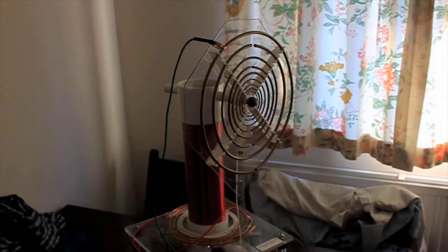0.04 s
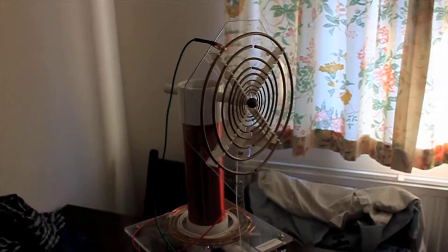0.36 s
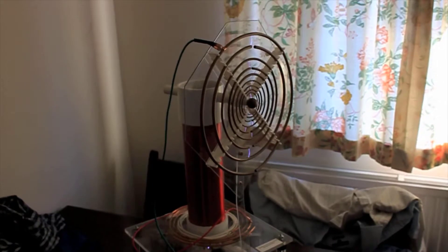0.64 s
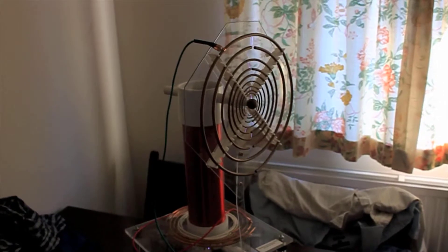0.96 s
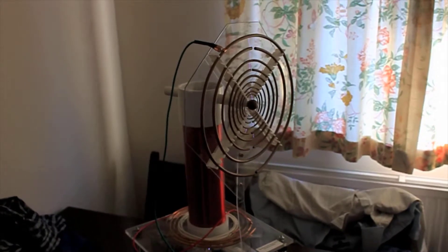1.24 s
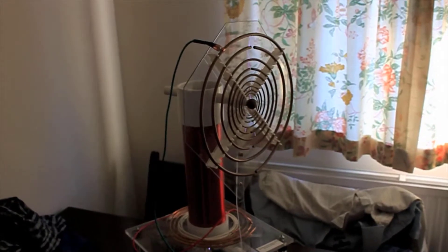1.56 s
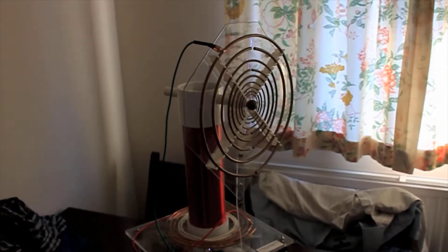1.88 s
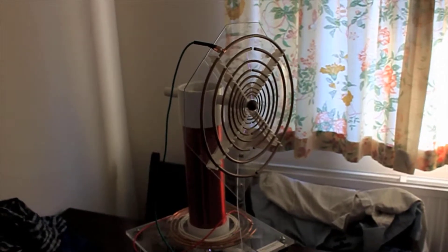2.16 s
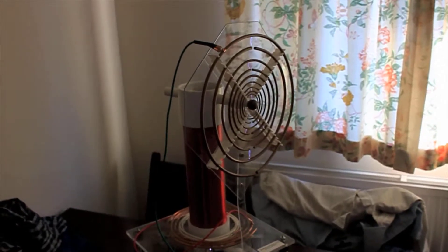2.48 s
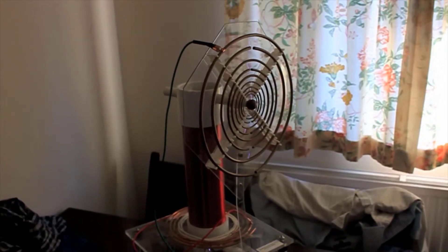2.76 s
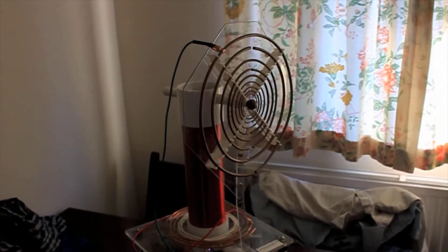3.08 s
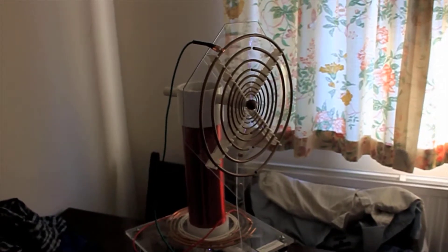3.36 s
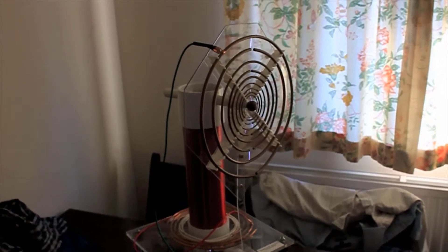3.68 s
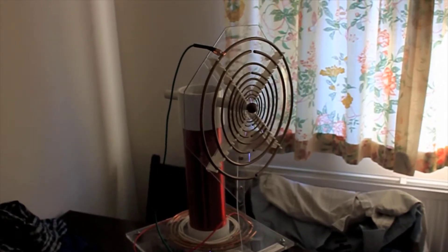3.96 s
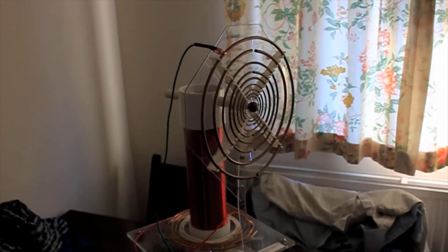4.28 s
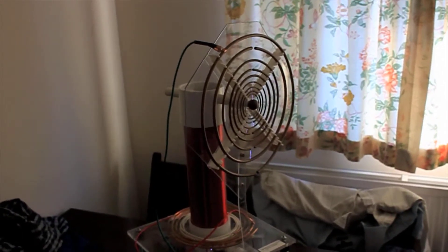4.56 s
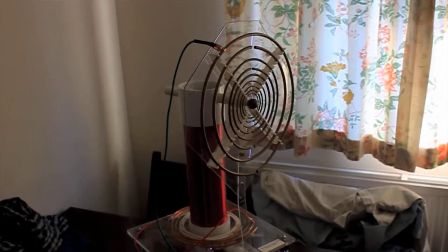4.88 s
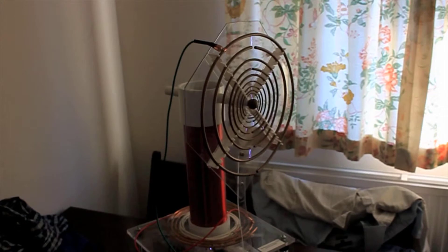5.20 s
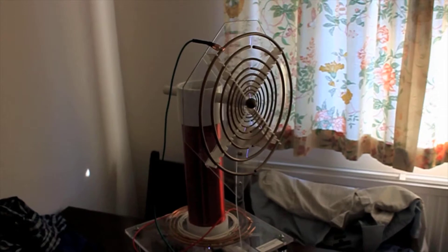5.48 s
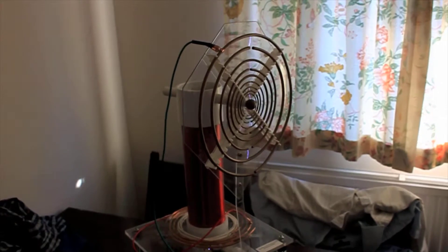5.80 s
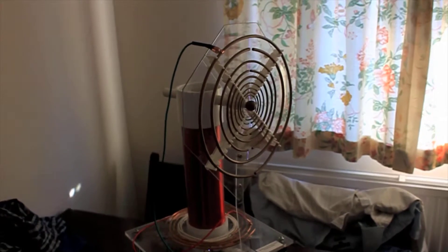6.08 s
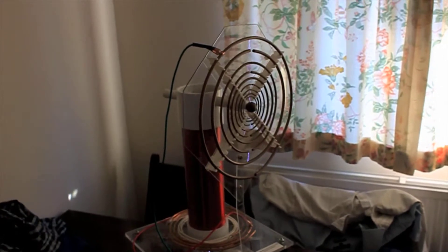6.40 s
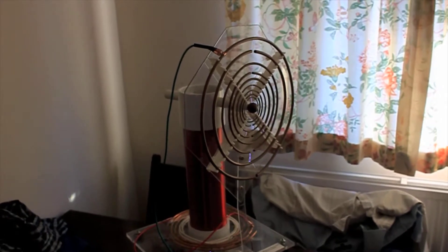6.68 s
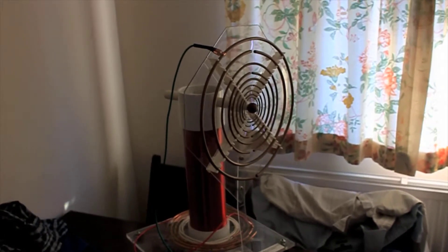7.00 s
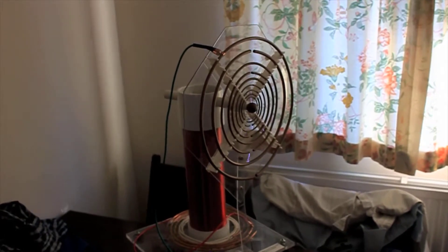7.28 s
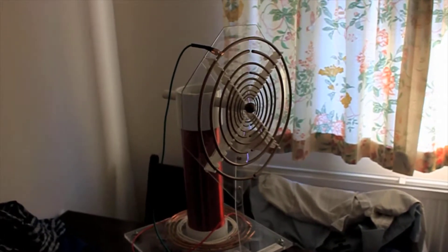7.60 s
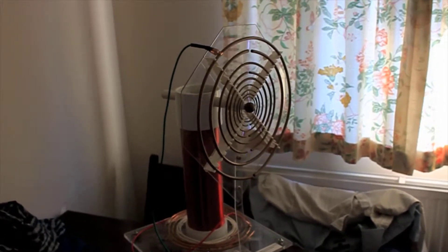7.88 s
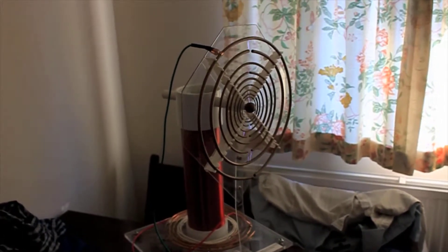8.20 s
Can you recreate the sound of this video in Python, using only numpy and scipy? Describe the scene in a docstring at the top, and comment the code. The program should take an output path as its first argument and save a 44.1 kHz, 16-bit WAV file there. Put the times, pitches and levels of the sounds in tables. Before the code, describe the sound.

Loud, steady, high electrical hiss and buzz from a sparking coil indoors, with flickering crackle and a faint hum beneath.

```python
"""Spark-gap coil in a small room

The gap fires nonstop, many times per mains half cycle: a loud, bright, buzzing hiss.
Streamers crackle from the top of the coil, flaring and stalling; their pushes of hot air
add up to a faint hum, and the longest ones pop. One microphone feeds both channels."""
import sys
import numpy as np
from scipy import signal
from scipy.fft import rfft, irfft, next_fast_len
from scipy.io import wavfile
from scipy.ndimage import uniform_filter1d

SR = 44100
rng = np.random.default_rng(int(sys.argv[2]) if len(sys.argv) > 2 else 0)


def to_wav(sig):
    """Store sig (one row per channel, or 1-D mono) as 16-bit WAV at the path in sys.argv[1].

    Samples outside -1..1 are clipped; the rate is SR.
    """
    pcm = np.clip(np.atleast_2d(sig), -1, 1) * 32767
    pcm = np.round(pcm).astype(np.int16)
    wavfile.write(sys.argv[1], SR, pcm.T)  # frames by channels


N = 363825
TIME_S = np.arange(N) / SR
MAINS_HZ = 50.022

# Spectrum of one gap firing. Each row: frequency in Hz, relative level in dB.
GAP_SPECTRUM = [(300, -41), (2000, -24), (4000, -13), (6300, -9), (7300, -5.5), (9500, -5), (10500, -3.5),
                (11800, -1.6), (13000, 0.5), (13700, -1.5), (14800, -1.5), (15600, -6)]
# Spectrum of one streamer. Each row: frequency in Hz, relative level in dB.
STREAMER_SPECTRUM = [(20, -28), (35, -15), (55, -15), (90, -6.5), (150, -2), (220, -3.5), (300, -3.5),
                     (700, -2), (1100, -0.5), (1700, 1.5), (2200, 1), (2700, -2), (4000, -3), (6000, -11.5),
                     (12000, -25.5)]
# Resonances of apparatus and room. Each row: frequency in Hz, width in Hz, lift in dB.
RESONANCES = [(1100, 40, 3.1), (1395, 40, 2.4), (1630, 110, 3.6), (3198, 220, 3.0), (4307, 50, 3.1),
              (4560, 200, 2.8), (4910, 50, 3.1), (5340, 50, 3.9), (5663, 90, 3.2), (5932, 90, 5.2),
              (6718, 50, 3.6), (6891, 50, 3.0), (7354, 120, 2.7), (8133, 40, 3.2), (8368, 40, 2.6),
              (8701, 50, 4.3), (9317, 45, 1.6), (9950, 50, 3.3), (10635, 60, 3.1), (11070, 70, 6.5),
              (11361, 55, 3.1), (11609, 80, 5.5), (11938, 70, 5.5), (12193, 70, 5.8), (12542, 60, 2.9),
              (12980, 70, 3.3), (13225, 60, 2.8), (14617, 60, 1.9), (14795, 90, 3.0), (15000, 90, 4.1)]
# Room decay. Each row: frequency in Hz, T60 in seconds.
ROOM_T60 = [(150, 0.17), (1500, 0.35), (6000, 0.22), (15000, 0.11)]
# Slow drift of streamer reach. Each row: time in seconds, level in dB.
REACH_DRIFT = [(0, -31), (.6, -34), (.8, -33.5), (1.05, -31), (1.5, -31), (2.3, -32.5), (2.6, -34.5),
               (2.98, -35), (3.27, -30), (3.45, -34), (4.05, -33), (4.45, -35), (4.8, -32.5), (5.2, -33),
               (6.05, -35), (6.42, -33), (7.4, -34.5), (8.25, -33.5)]
# Streamers flare. Each row: centre in seconds, length in seconds, lift in dB.
REACH_FLARES = [(.855, 0.046, 2.5), (1.52, 0.05, 2), (2.28, 0.068, 2.5), (2.81, 0.043, 4.5), (4.11, .06, 4),
                (4.68, 0.084, 2), (5.85, .04, 5), (7.07, .08, 2.5)]
# Streamers stall. Each row: centre in seconds, length in seconds, drop in dB.
REACH_STALLS = [(.61, .06, 1), (.75, .07, 2.5), (.91, 0.079, 3), (1.386, 0.042, 3), (2.21, 0.092, 2.5),
                (2.675, .07, 2), (2.91, .08, -1), (3.93, 0.045, 4), (4.24, 0.087, 2), (4.5, .1, 2),
                (5.25, 0.064, 4), (5.62, .1, 3), (5.98, 0.081, 2), (6.67, 0.074, 3), (7.29, 0.15, 2)]
# Hiss near 12 kHz, mean removed in use. Each row: time in seconds, lift in dB.
SIZZLE_LIFT = [(0, 5), (.3, 3.5), (.6, 5.5), (1.6, 5), (2.35, 3), (3.6, 4), (4.45, 3), (4.75, 4),
               (5.2, 2.7), (6.3, 4.5), (6.95, 1.5), (7.15, 5.5), (7.9, 2.5), (8.25, 3)]
# Hiss above 13.5 kHz, mean removed in use. Each row: time in seconds, lift in dB.
AIR_LIFT = [(0, 1.2), (.7, 2.3), (1.55, -1), (3.3, -1), (3.55, 3.5), (3.9, -.9), (5.5, 1.5), (6.05, -1),
            (6.9, 1.5), (7.25, -1.2), (8.25, 1)]
# Pops of the longest streamers. Each row: start in seconds, peak in dB.
STREAMER_POPS = [(.448, -25), (.861, -26), (1.071, -23), (1.667, -20), (2.530, -25), (2.969, -28),
                 (6.385, -26)]


def gain(db):
    """dB to amplitude."""
    return 10 ** (np.asarray(db) / 20)


def unit_rms(x):
    """Scale to rms 1."""
    return x / np.sqrt(np.mean(x ** 2) + 1e-20)


def at_hz(table, hz):
    """Interpolate on a log-frequency axis."""
    row_hz, values = np.transpose(table)
    return np.interp(np.log(hz + 1), np.log(row_hz + 1), values)


def curve(table):
    """Interpolate in time, per sample."""
    return np.interp(TIME_S, *np.transpose(table))


def wander(corner_hz):
    """Low-passed noise, rms 1."""
    hz = np.fft.rfftfreq(N, 1 / SR)
    phases = np.exp(2j * np.pi * rng.random(len(hz)))
    return unit_rms(irfft(phases / (1 + (hz / corner_hz) ** 4), N))


def steady(x, window_samples):
    """Hold the slow level at rms 1; keep fast flicker."""
    return x / np.sqrt(uniform_filter1d(x ** 2, window_samples) + 1e-12)


def colour(x, spectrum, taps=4096):
    """Minimum-phase filter: broad spectrum plus narrow resonances."""
    hz = abs(np.fft.fftfreq(taps, 1 / SR))
    peaks_db = sum(lift_db / (1 + (2 * (hz - centre_hz) / width_hz) ** 2)
                   for centre_hz, width_hz, lift_db in RESONANCES)
    magnitude = gain(at_hz(spectrum, hz) + peaks_db)
    response = np.exp(np.conj(signal.hilbert(np.log(magnitude))))
    return signal.oaconvolve(x, np.fft.ifft(response).real)[:N]


def band(x, low_hz, high_hz):
    """Brick-wall band-pass."""
    hz = np.fft.rfftfreq(N, 1 / SR)
    return irfft(rfft(x) * (hz > low_hz) * (hz < high_hz), N)


def highpass(x, corner_hz):
    """Second-order low cut."""
    return signal.sosfilt(signal.butter(2, corner_hz, "high", fs=SR, output="sos"), x)


def room(x, direct_db, tail_db, early_db, early_peak_s, taps=12000):
    """Direct sound, early reflections and a short tail ripple the spectrum; bass stays dry."""
    age = np.arange(taps) / SR / early_peak_s
    reflections = rng.standard_normal(taps) * (rng.random(taps) < .3)
    early = unit_rms(reflections * age * np.exp(-age))
    hz, frame_s, noise = signal.stft(rng.standard_normal(taps), SR, nperseg=256)
    decay = gain(-60 * frame_s / at_hz(ROOM_T60, hz)[:, None])
    tail = unit_rms(signal.istft(noise * decay, SR, nperseg=256)[1][:taps])
    echoes = (gain(early_db) * early + gain(tail_db) * tail) / np.sqrt(taps)
    n_fft = next_fast_len(N + taps)
    response = gain(direct_db) + rfft(highpass(echoes, 900), n_fft)
    response /= np.sqrt(uniform_filter1d(abs(response) ** 2, 3000))  # flat over about 350 Hz
    return irfft(rfft(x, n_fft) * response, n_fft)[:N]


def bumps_db(table):
    """One raised-cosine bump per row."""
    return sum(db * np.cos(np.pi * np.clip((TIME_S - centre_s) / length_s, -.5, .5)) ** 2
               for centre_s, length_s, db in table)


def reach():
    """Discharge strength in dB: drift, flares, stalls, random sputter."""
    sputter_db = 0.88 * wander(14)
    return curve(REACH_DRIFT) + bumps_db(REACH_FLARES) - bumps_db(REACH_STALLS) + sputter_db


def firings(mean_per_s, start_s, rest_share, sag_db, smooth_s, jitter):
    """Capacitor discharges as impulses; each mains half cycle starts hard, sags, then rests."""
    phase = (2 * MAINS_HZ * (TIME_S - start_s) + .04 * wander(40)) % 1
    supply = (phase < 1 - rest_share) * 1.
    sag = gain(sag_db * (.5 - phase))
    for _ in range(2):
        supply, sag = uniform_filter1d([supply, sag], round(smooth_s * SR))
    current = abs(supply) * np.exp(jitter * wander(900))
    charge = np.cumsum(current / current.mean()) * mean_per_s / SR
    return np.diff(np.floor(charge), prepend=0) * sag


def arc_drift(hiss, patch_rms_db=1.0):
    """The moving arc shifts the hiss colour: two treble bands and small random patches."""
    hz, frame_s, bins = signal.stft(hiss, SR, nperseg=1024)
    patches = uniform_filter1d(rng.standard_normal(bins.shape), 18, axis=0)
    shift_db = patch_rms_db * unit_rms(uniform_filter1d(patches, 22, axis=1))
    sizzle = np.interp(hz, [10000, 11000, 13200, 13800], [0, 1, 1, 0])
    air = np.interp(hz, [13200, 13800], [0, 1])
    for region, lift_db in [(sizzle, curve(SIZZLE_LIFT)), (air, curve(AIR_LIFT))]:
        shift_db += np.outer(region, np.interp(frame_s, TIME_S, lift_db - lift_db.mean()))
    return signal.istft(bins * gain(shift_db), SR, nperseg=1024)[1][:N]


def spark_gap(reach_db, spots=4, base_db=-17.5, db_per_reach_db=0.36):
    """Cracks jump between electrode spots and arrive mostly as echoes, different for each spot."""
    cracks = firings(mean_per_s=2800, start_s=.0066, rest_share=.2, sag_db=4, smooth_s=.0009, jitter=.45)
    spot = rng.integers(0, spots, N)
    trains = [cracks * (spot == k) * gain(2.7 * wander(1.43)) for k in range(spots)]
    hiss = sum(room(train, direct_db=-9, tail_db=0.5, early_db=1, early_peak_s=.0013)
               for train in trains)
    hiss = arc_drift(steady(colour(hiss, GAP_SPECTRUM), window_samples=6000))
    flicker_db = 0.33 * wander(28)
    return hiss * gain(base_db + db_per_reach_db * (reach_db - reach_db.mean()) + flicker_db)


def streamers(reach_db, branches=4):
    """Sparks of uneven length leap into the air; when most push the same way, they also hum."""
    excess_db = reach_db - reach_db.mean()
    size_db = np.minimum(3.3 * rng.exponential(1, N) + 1.6 * wander(106), 7) + 0.66 * wander(26)
    positive_share = .84 + .035 * excess_db + .14 * wander(8)
    polarity = np.where(rng.random(N) < positive_share, 1, -1)
    snaps = firings(mean_per_s=900, start_s=.0076, rest_share=.24, sag_db=6, smooth_s=.0006, jitter=.8)
    snaps *= gain(size_db) * polarity
    branch = rng.integers(0, branches, N)
    crackle = sum(room(snaps * (branch == k), direct_db=-.5, tail_db=-7.5, early_db=-6,
                       early_peak_s=.00086) for k in range(branches))
    crackle = band(colour(crackle, STREAMER_SPECTRUM), 18, SR / 2)
    crackle = steady(crackle, window_samples=2400)
    # Short streamers lose bass; long ones rasp.
    shortfall_db = np.maximum(2.6 * wander(14) - excess_db, 0)
    bass = band(crackle, 18, 330) * (gain(0.96 - 0.95 * shortfall_db) - 1)
    rasp = band(crackle, 1400, 2030) * (gain(0.13 * excess_db) - 1)
    return (crackle + bass + rasp) * gain(reach_db + 1.72)


def pops(decay_s=0.00057, taps=400):
    """A long channel heats the air at once: one rounded push, then a slow return."""
    age = np.arange(taps) / SR / decay_s
    push = age * (2 - age) * np.exp(-age)
    start_s, peak_db = np.transpose(STREAMER_POPS)
    kicks = np.bincount(np.round(start_s * SR).astype(int), gain(peak_db), N)
    return signal.oaconvolve(kicks, -push / push.max())[:N]


def scene():
    """One discharge drives hiss and crackle; pops on top, both channels alike."""
    reach_db = reach()
    return np.tile(spark_gap(reach_db) + streamers(reach_db) + pops(), (2, 1))


def record(dry):
    """Input stage: soft clip, low cut, band limit."""
    ceiling, cutoff_hz = gain(-11), 15740
    rounded = ceiling * np.tanh(dry / ceiling)
    lowpass = signal.firwin(1023, cutoff_hz, window=("kaiser", 9), fs=SR)
    return signal.oaconvolve(highpass(rounded, 45), lowpass[None], "same")


dry = scene()
out = record(dry)
to_wav(out)
```